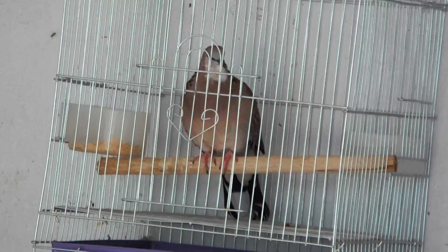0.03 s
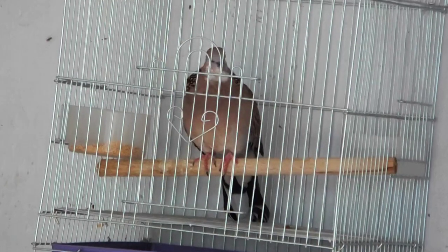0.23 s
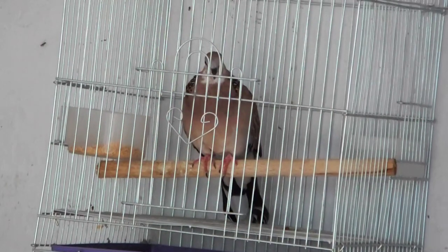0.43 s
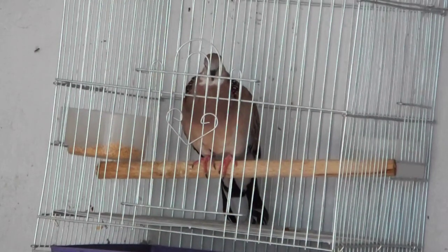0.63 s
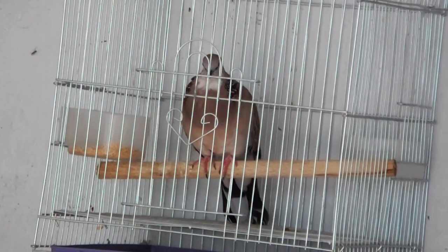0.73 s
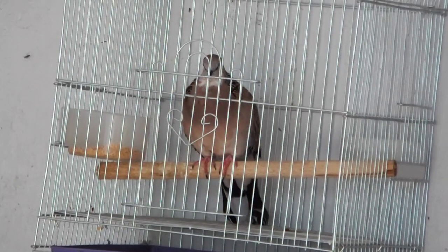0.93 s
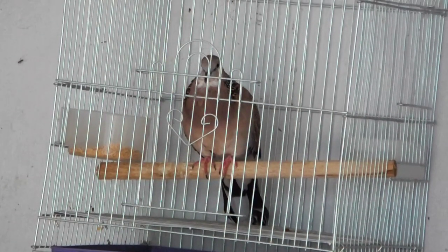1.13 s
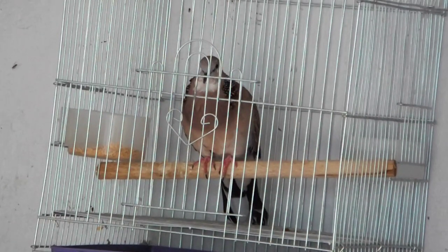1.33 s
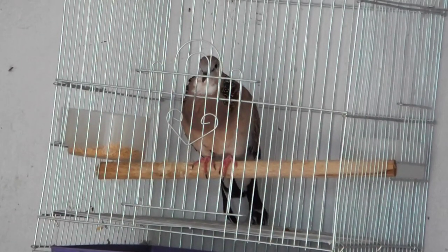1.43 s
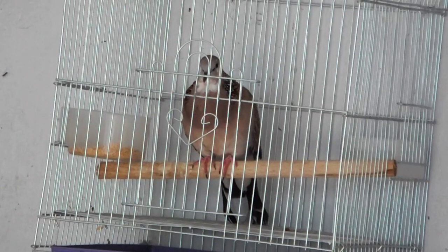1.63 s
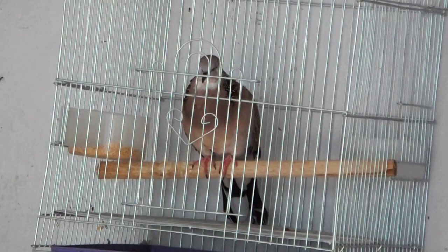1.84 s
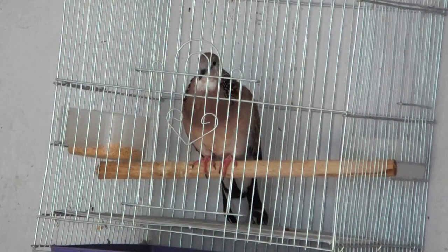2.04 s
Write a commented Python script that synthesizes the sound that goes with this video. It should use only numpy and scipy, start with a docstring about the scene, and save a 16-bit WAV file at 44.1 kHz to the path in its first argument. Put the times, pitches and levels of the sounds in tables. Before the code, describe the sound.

Close dove cooing: soft note, arched coo, rolled trill, last coo, with metallic clatter behind

```python
"""Hard-walled yard: a caged dove close by gives a soft note, an arched coo, a rolled trill, a last coo.
Dove: gliding sines and a pulsed tone; the yard adds a ring after the arched coo, echoes and a reverberant tail.
Far hoots: windowed sines; tiny peeps: fuzzy tones.
Clatter of wire or sheet metal some way off: coloured noise bursts, resonators and thin ringing lines.
Behind: insects (pulsed tone, shaped noise) over a low rumble (shaped noise). All fades in at the start."""
import sys
import numpy as np
from scipy import signal
from scipy.fft import rfft, irfft
from scipy.io import wavfile
from scipy.ndimage import uniform_filter1d

SR = 44100
rng = np.random.default_rng(int(sys.argv[2]) if len(sys.argv) > 2 else 0)


def volts(x):
    """Linear amplitude factor 10**(x/20) for a level x in dB, scalar or array-like."""
    e = np.asarray(x, float) / 20
    return 10 ** e


def int16_out(signal):
    """Quantize to a 16-bit WAV file."""
    q = np.round(np.clip(np.atleast_2d(signal).T, -1, 1) * 32767)
    wavfile.write(sys.argv[1], SR, q.astype(np.int16))


N = 92036


def evened(x):
    """Scales to rms 1."""
    return x / np.sqrt(np.mean(x ** 2) + 1e-20)


def read(points, hz):
    """Interpolates a table on a log-frequency axis."""
    f, value = np.transpose(points)
    return np.interp(np.log(hz + 1), np.log(f + 1), value)


def add(mix, start_s, sound):
    """Mixes a sound in at start_s, cut at the end of the mix."""
    part = mix[round(start_s * SR):][:len(sound)]
    part += sound[:len(part)]


def resonate(x, hz, width_hz):
    """One-pole resonance of gain 1: shift to 0 Hz, lowpass, shift back."""
    turn = np.exp(2j * np.pi * hz * np.arange(len(x)) / SR)
    r = np.exp(-np.pi * width_hz / SR)
    return 2 * (turn * signal.lfilter([1 - r], [1, -r], x / turn)).real


def colour(x, table):
    """Filters by a spectrum table."""
    hz = np.fft.rfftfreq(len(x), 1 / SR)
    return irfft(rfft(x) * volts(read(table, hz)), len(x))


def whistle(hz):
    """Sine of rms 1 following a frequency track."""
    return np.sqrt(2) * np.sin(2 * np.pi * np.cumsum(hz) / SR)


# L-R likeness of diffuse sound: f/Hz, correlation
LIKENESS = [(40, .98), (150, .75), (900, .99), (2500, .94), (6000, .74), (9000, .52), (14000, .36)]
# L-R balance, positive = left: f/Hz, level/dB
BALANCE = [(40, -1.2), (500, -1), (6000, .8), (13000, 2.3)]


def bed(shape, level_db, patchy_db):
    """Stereo noise from random short-time spectra with drifting patches."""
    frames, hz = N // 256 + 5, np.fft.rfftfreq(1024, 1 / SR)
    a, b, c, d, patch = rng.standard_normal((frames, 513, 5)).T
    patch = uniform_filter1d(patch, size=12, axis=0)
    patch = evened(uniform_filter1d(patch, size=14, axis=1))
    left, other = a + 1j * b, c + 1j * d
    same = np.clip(read(LIKENESS, hz), -1, 1)[:, None]
    right = same * left + np.sqrt(1 - same ** 2) * other
    lean = volts(read(BALANCE, hz) / 2)[:, None]
    z = np.array([left * lean, right / lean])
    z *= volts(read(shape, hz)[:, None] + patchy_db * patch)
    noise = signal.istft(z, nperseg=1024, noverlap=768)[1][:, :N]
    return volts(level_db) * evened(noise)


# insect chorus and hiss spectrum: f/Hz, relative level/dB
CHORUS = [(800, -10.5), (1560, -10), (1900, -17.5), (3000, -19), (4600, -12.5), (6400, 1), (7200, -12.5),
          (8400, -21), (12000, -25.5), (15700, -29)]


def insect_chorus():
    """Insect chorus and hiss: mildly patchy shaped noise."""
    return bed(CHORUS, -43.5, patchy_db=1.5)


# rumble spectrum: f/Hz, relative level/dB
RUMBLE_SHAPE = [(15, -16), (38, 8), (70, 4.5), (130, -10.5), (200, -14), (500, -27.5), (1000, -45.5)]


def rumble():
    """Low rumble: nearly steady shaped noise."""
    return bed(RUMBLE_SHAPE, -46, patchy_db=0.3)


CRICKET_HZ, CRICKET_FUZZ_WIDTH_HZ = 6670, 40.4
CHIRPS_PER_S, CHIRP_CENTRE_S, CHIRP_DUTY = 25.85, 1.148, 0.56


def cricket():
    """Sine plus narrowband noise, gated into steady chirps."""
    t = np.arange(N) / SR
    place = (CHIRPS_PER_S * (t - CHIRP_CENTRE_S) + .5) % 1 - .5  # in periods, 0 = chirp centre
    gate = np.exp(-(2 * place / CHIRP_DUTY) ** 4)
    fuzz = evened(resonate(rng.standard_normal(N), CRICKET_HZ, CRICKET_FUZZ_WIDTH_HZ))
    tone = np.sin(2 * np.pi * CRICKET_HZ * t)
    return volts(-47) * gate * (tone + 0.46 * fuzz)


# rattles: t/s, decay/s, dull crash relative level/dB, bright crash relative level/dB, ringing relative level/dB
RATTLES = [(0.189, 0.018, -47, -44, -80), (0.318, 0.049, -56, -55.5, -67), (0.607, 0.078, -60.5, -51, -88),
           (0.85, 0.021, -43.5, -51, -76), (1.134, 0.1, -70.5, -54, -89), (1.525, 0.077, -44.5, -66, -67),
           (1.59, 0.054, -44, -52, -50), (1.831, 0.068, -39, -37.5, -34.5)]
# dull crash spectrum: f/Hz, relative level/dB
DULL_CRASH = [(60, 1), (200, -4), (1500, -3.5), (5000, -7), (9000, -52)]
# bright crash spectrum: f/Hz, relative level/dB
BRIGHT_CRASH = [(800, -54), (2500, -11.5), (4500, 0), (7000, 0.5), (8500, -12), (16000, -38)]
# sheet-metal modes: f/Hz, width of first pole/Hz, relative level/dB
METAL_MODES = [(1510, 150, -13), (2380, 70, -5), (3710, 170, -3), (4290, 150, 0), (5210, 130, -6),
               (5600, 200, -4), (7030, 130, -8), (9500, 400, -21)]
RISE_PER_DECAY, KNOCKS_PER_S, GRAIN = 0.36, 410, 0.4


def clatter():
    """Rattling bursts: dull and bright noise crashes plus noise-driven metal modes."""
    out, t = np.zeros(N), np.arange(SR // 2) / SR
    for start_s, decay_s, dull_db, bright_db, ring_db in RATTLES:
        dull, bright, drive = rng.standard_normal((3, len(t)))
        knocks = (rng.random(len(t)) < KNOCKS_PER_S / SR) * rng.exponential(1, len(t))
        knocks = uniform_filter1d(knocks, size=60)
        shake = np.minimum(t / (RISE_PER_DECAY * decay_s), 1) * np.exp(-(t / decay_s) ** 2)
        shake *= 1 + GRAIN * evened(knocks)
        ring = np.zeros(len(t))
        for hz, width_hz, db in METAL_MODES:
            mode = resonate(resonate(drive, hz, width_hz), hz, 2 * width_hz)
            ring += volts(db) * evened(mode)
        burst = volts(dull_db) * evened(colour(dull, DULL_CRASH))
        burst += volts(bright_db) * evened(colour(bright, BRIGHT_CRASH))
        burst += volts(ring_db) * evened(ring)
        add(out, start_s, shake * burst)
    return out


# smooth tone strands, may overlap: dove voice; the last is the yard's lingering ring near 740 Hz
# after the arched coo. One table each: t/s, f/Hz, relative level/dB
TONE_STRANDS = [
    [(.262, 547, -64), (.275, 560, -38.5), (.295, 566, -34.5), (.312, 560, -48), (.345, 575, -44),
     (.365, 580, -60)],
    [(.265, 648, -76), (.285, 672, -43.5), (.34, 669, -61)],
    [(.548, 536, -62), (.562, 558, -37), (.59, 594, -29), (.63, 571, -46.5), (.68, 570, -41)],
    [(.53, 729, -53), (.545, 688, -54), (.57, 681.4, -34), (.594, 704, -38), (.606, 686.4, -18),
     (.62, 762, -32.5), (.668, 782, -41.5), (.685, 754, -21.5), (.697, 712.4, -16), (.712, 662.6, -24),
     (.732, 634, -35.5)],
    [(1.243, 638, -72), (1.255, 612, -28), (1.285, 587.5, -33), (1.32, 555, -34), (1.34, 540, -46),
     (1.42, 484, -47), (1.435, 470, -62)],
    [(1.725, 572, -47), (1.74, 576, -29), (1.755, 657.5, -28), (1.77, 671.6, -18.5), (1.825, 682.2, -19.5),
     (1.842, 652.5, -31), (1.86, 670, -23), (1.885, 670, -31), (1.915, 668, -42)],
    [(.76, 725, -42), (.775, 742, -36), (.805, 735, -52), (.825, 746, -40), (.868, 728, -48),
     (.91, 735, -50)],
]
# trill pulses: nominal centre t/s, relative level/dB, nominal length/s
TRILL_PULSES = [(0.946, -21.5, 0.025), (0.964, -31, 0.015), (0.983, -23, 0.012), (1.003, -21, 0.016),
                (1.03, -22.5, 0.026), (1.052, -21, 0.011), (1.073, -24, 0.015), (1.094, -22.5, 0.018),
                (1.119, -20, 0.025), (1.139, -22, 0.026), (1.159, -19.5, 0.023), (1.191, -26, 0.064),
                (1.201, -19, 0.011), (1.219, -22, 0.014), (1.238, -22, 0.02)]
# trill pitch before the slide: t/s, f/Hz
TRILL_TRACK = [(.93, 692), (1.1, 692), (1.19, 655), (1.215, 682.5), (1.25, 640)]
# wall echoes: delay t/s, level re direct/dB
WALL_ECHOES = [(.055, -17), (.158, -25)]
TRILL_RISE_HZ_PER_S, RASP_HZ, RASP_DEPTH = 3200, 122, .17


def dove_and_echoes():
    """Gliding sine coos, the yard's ring as one more sine, a sliding pulsed trill with AM rasp; wall echoes."""
    out, gate, t = np.zeros(N), np.zeros(N), np.arange(N) / SR
    for s, hz, db in map(np.transpose, TONE_STRANDS):
        u = np.arange(s[0], s[-1], 1 / SR)
        level = uniform_filter1d(volts(np.interp(u, s, db)), size=200)
        pitch_hz = uniform_filter1d(np.interp(u, s, hz), size=300)
        add(out, s[0], level * whistle(pitch_hz))
    for k, (s, db, length_s) in enumerate(TRILL_PULSES):
        window = np.hanning(round(1.403 * length_s * SR)) ** 0.64
        add(gate, s - 0.74 * length_s, (-1) ** k * volts(db) * window)  # alternate sign, as in a beat
    centre = np.transpose(TRILL_PULSES)[0]
    nearest = np.searchsorted((centre[1:] + centre[:-1]) / 2, t)
    slide_s = np.clip(t - centre[nearest], -.02, .02)
    hz = np.interp(t, *np.transpose(TRILL_TRACK)) + TRILL_RISE_HZ_PER_S * slide_s
    rasp = 1 + RASP_DEPTH * np.cos(2 * np.pi * RASP_HZ * t)
    out += gate * rasp * whistle(uniform_filter1d(hz, size=100))
    direct = out.copy()
    for delay_s, db in WALL_ECHOES:
        add(out, delay_s, volts(db) * direct)
    return out


# tiny peeps: centre t/s, level/dB
PEEP_TIMES = [(0.555, -48), (0.617, -51), (0.7, -50)]
PEEP_HZ, PEEP_HALF_S, PEEP_FUZZ = 2700, .006, .5  # fuzz: rms frequency jitter, share of f


def peeps():
    """Tiny husky peeps: Gaussian-windowed tones with random frequency jitter."""
    out = np.zeros(N)
    for centre_s, db in PEEP_TIMES:
        t = np.arange(-2 * PEEP_HALF_S, 2 * PEEP_HALF_S, 1 / SR)
        window = np.exp(-(t / PEEP_HALF_S) ** 2 * 2)
        hz = PEEP_HZ * (1 + PEEP_FUZZ * rng.standard_normal(len(t)))
        add(out, centre_s + t[0], volts(db) * window * whistle(hz))
    return out


# far hoots: t/s, length/s, level/dB
HOOTS = [(1.407, 0.13, -52), (1.641, 0.07, -45), (1.872, 0.065, -46)]


def far_dove():
    """Soft low hoots: windowed steady sines."""
    out = np.zeros(N)
    for start_s, length_s, db in HOOTS:
        window = signal.windows.tukey(round(length_s * SR), .6)
        add(out, start_s, volts(db) * window * whistle(np.full(len(window), 401.3)))
    return out


# wire shakes: t/s, level before envelope/dB
SHAKES = [(1.588, -39), (1.845, -37)]
# thin-wire lines: f/Hz, relative level/dB
WIRE_LINES = [(3290, -6), (4370, 0), (5215, -5), (5570, -5), (11500, -26)]
WIRE_WIDTH_HZ, WIRE_RISE_S, WIRE_DECAY_S = 50, .0052, .08


def wire():
    """Shaken thin wire: sines plus narrowband noise, quick rise, exponential decay."""
    out, t = np.zeros(N), np.arange(SR // 2) / SR
    for start_s, level_db in SHAKES:
        noise = rng.standard_normal(len(t))
        ring = np.zeros(len(t))
        for hz, db in WIRE_LINES:
            fuzz = evened(resonate(noise, hz, WIRE_WIDTH_HZ))
            ring += volts(db) * (whistle(np.full(len(t), hz)) + fuzz)
        shake = np.minimum(t / WIRE_RISE_S, 1) * np.exp(-t / WIRE_DECAY_S)
        add(out, start_s, volts(level_db) * shake * evened(ring))
    return out


# yard decay: f/Hz, t60/s
YARD_DECAY = [(700, 0.69), (2500, 0.59), (6000, 0.7), (12000, 0.41)]


def yard(x):
    """Stereo tail of sparse random taps, each band dying at its own speed."""
    taps = np.zeros((2, SR))
    at = np.arange(400, SR - 20, 20) + rng.integers(0, 20, (2, (SR - 401) // 20))
    np.put_along_axis(taps, at, rng.choice([-1., 1.], at.shape), 1)
    hz, t, (left, other) = signal.stft(taps, SR, nperseg=256)
    same = np.clip(read(LIKENESS, hz), 0, 1)[:, None]
    right = same * left + np.sqrt(1 - same ** 2) * other
    hall = np.array([left, right]) * volts(-60 * t / read(YARD_DECAY, hz)[:, None])
    hall = hall / np.linalg.norm(hall[0], axis=1)[:, None]  # equal energy per band
    tail = signal.istft(hall, SR, nperseg=256)[1]
    return signal.fftconvolve(x[None], tail / np.linalg.norm(tail[0]), axes=1)[:, :N]


def scene():
    """Sums all sources, direct and through the yard."""
    bird, far, metal, ring = dove_and_echoes(), peeps() + far_dove(), clatter(), wire()
    late = np.zeros(N)
    add(late, .02, bird)  # the near dove's tail starts 20 ms later
    near = (bird + volts(-15) * yard(late)) * volts(-.5 * np.array([[1], [-1]]))
    distant = far + volts(-5.5) * yard(far)
    distant += volts(3.5) * metal + volts(7.0) * yard(metal)
    distant += ring + volts(-5) * yard(ring)
    insects = cricket() * volts(np.array([[1.1], [-1.1]])) + insect_chorus()
    return near + distant + insects + rumble()


def top_cut(x):
    """Nothing passes above the cut-off."""
    return signal.sosfilt(signal.butter(12, 15710, fs=SR, output="sos"), x)


# opening fade: t/s, level/dB
FADE = [(0, -88), (.028, -75), (.032, -42.5), (0.098, -20), (0.158, -9), (0.207, -0.5)]


def record(dry):
    """Fades the mix in."""
    s, db = np.transpose(FADE)
    mix = dry * volts(np.interp(np.arange(N) / SR, s, db))
    return top_cut(mix)


dry = scene()
out = record(dry)
int16_out(out)
```